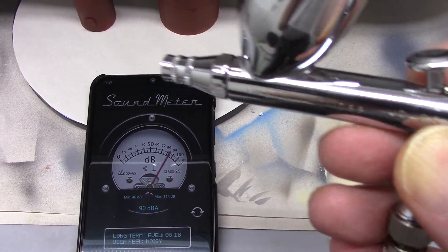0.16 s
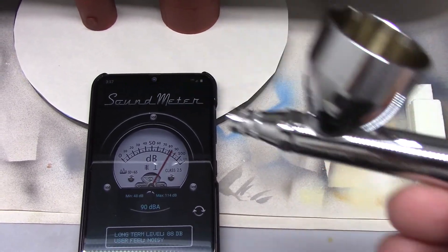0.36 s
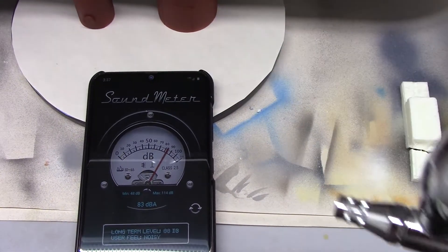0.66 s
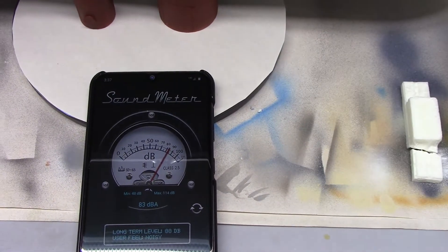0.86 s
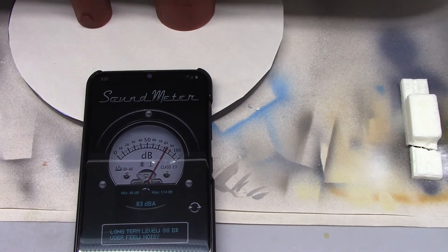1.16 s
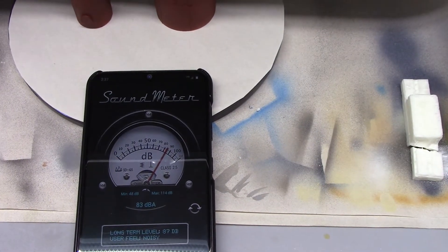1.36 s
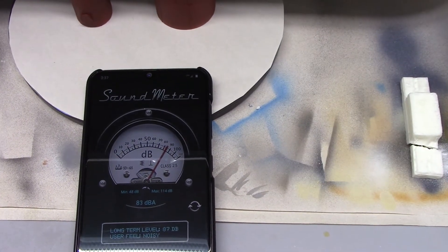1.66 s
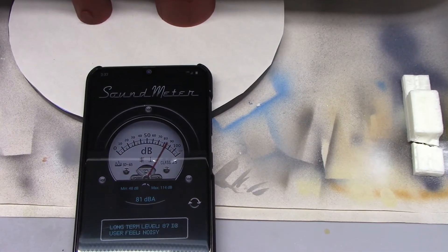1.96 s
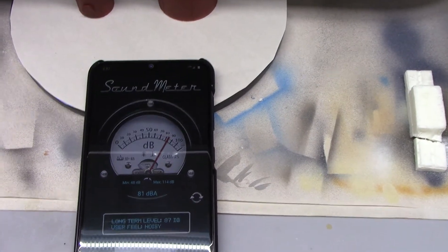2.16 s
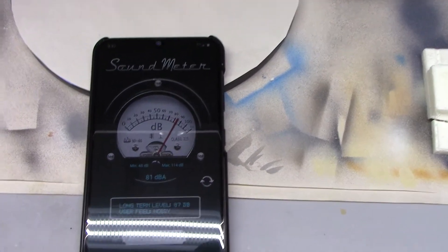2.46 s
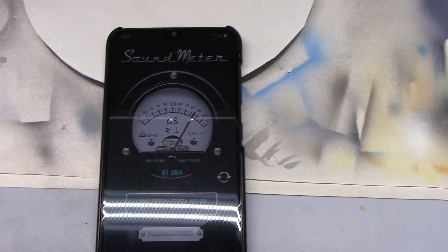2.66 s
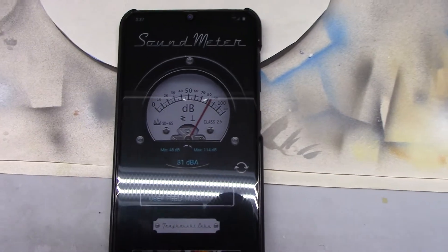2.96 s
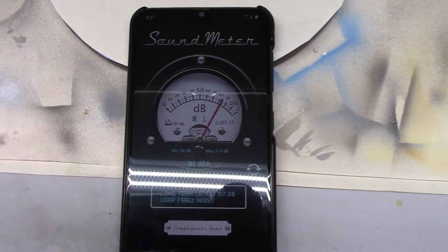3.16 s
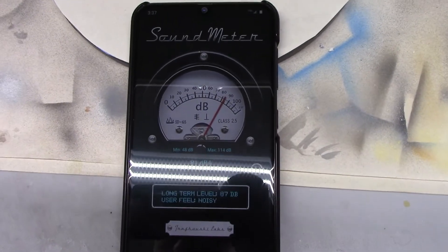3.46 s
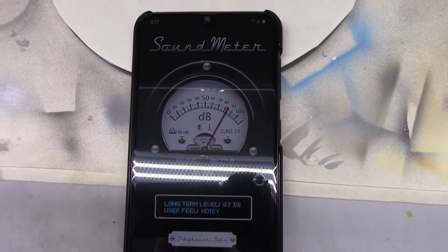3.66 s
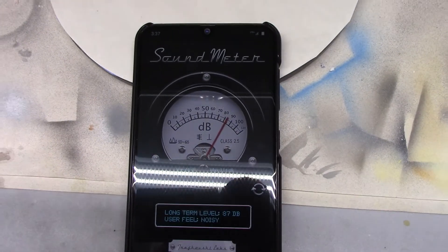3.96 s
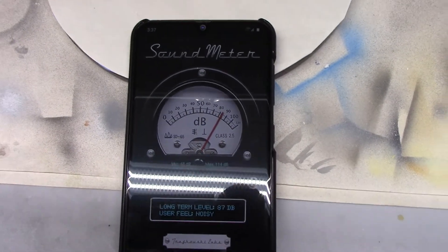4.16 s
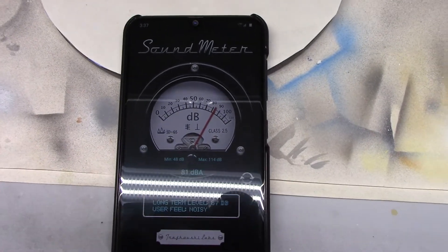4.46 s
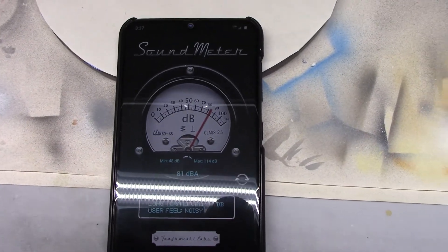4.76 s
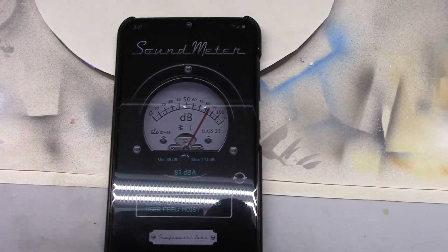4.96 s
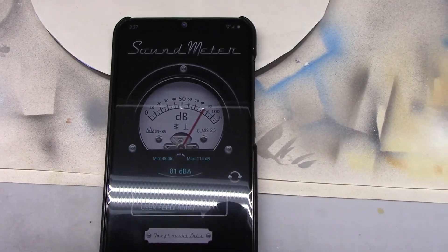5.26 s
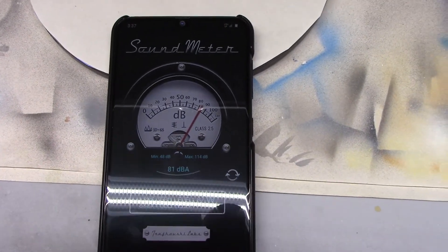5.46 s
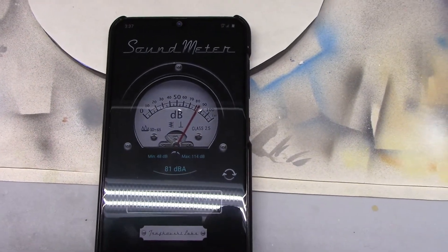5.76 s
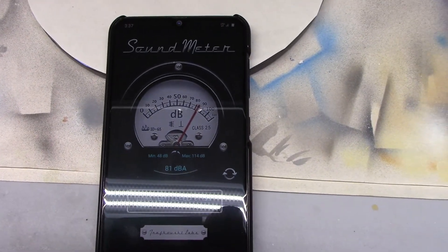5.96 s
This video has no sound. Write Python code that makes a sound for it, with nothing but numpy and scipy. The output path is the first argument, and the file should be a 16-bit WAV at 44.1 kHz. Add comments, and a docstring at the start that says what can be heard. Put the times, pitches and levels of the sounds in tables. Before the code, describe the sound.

From 0 s to about 6 s a small electric piston air compressor runs at full, steady speed, with no start or stop. The shaft turns nearly twenty-nine times a second, so its intake throb blurs into a rough low drone, strongest around 170 Hz, with buzzing motor tones and a slight fast beating. Over it lies a dense, hard chatter of valve and piston knocks, mostly between 400 and 2000 Hz, and filtered air hiss pulsing twice per turn. A thin metallic casing whine near 5 kHz swells around 0.7 s and fades by 2 s. Between 2.2 and 3 s the microphone shifts a little, gently changing the tonal balance; the whine rises again near 3.3 s, then gradually sinks toward the end. The loudness stays nearly even, close and mostly central, in a hard-walled workspace, with only faint stereo spread.

```python
"""A small motor-driven piston air compressor runs in a hard-walled workspace.
From the start each shaft turn repeats intake throb, valve and piston knocks and casing ring, a sum of shaft
orders; slow beats and the motor add side tones, and filtered noise rushes twice a turn. The casing whine swells
near 0.7 s. From 2.2 to 3 s the microphone shifts a little, crossfading to a second blend of tones; the whine
swells again near 3.3 s, then sinks toward the end."""
import sys
import numpy as np
from scipy import signal
from scipy.fft import rfft, irfft, next_fast_len
from scipy.io import wavfile
from scipy.ndimage import uniform_filter1d

SR = 44100
rng = np.random.default_rng(int(sys.argv[2]) if len(sys.argv) > 2 else 0)


def bounce(signal):
    """Save signal as a 16-bit WAV file at the path given by the first command-line argument."""
    frames = np.transpose(np.atleast_2d(signal))
    limited = np.clip(frames, -1, 1)
    pcm = np.round(limited * 32767).astype(np.int16)
    wavfile.write(sys.argv[1], SR, pcm)


N = 269451

SHAFT_HZ, START_TURN = 28.704, .0664  # mean shaft speed; shaft angle at the start [turns]
PUSH_MOMENT = .825  # the piston's push, orders 2 and 3 [turns]
PULL_HZ = 120  # magnetic pull of the motor, twice the mains
EDGE_HZ = 15730  # upper band limit
TURN_POINTS, ORDERS = 8192, 540  # points in one stored turn; shaft orders, counted from 0

# Microphone shift: (time [s], share of the way moved [0-1])
MIC_SHIFT = [(0, 0.17), (2.2, 0), (3.0, 0.86), (6.2, 0.98)]
# Rushing air and rattle, before peaks, ripples and swing: (frequency [Hz], density [dB per Hz])
RUSH_COLOUR = [(45, -88), (90, -90), (150, -70), (270, -71.5), (540, -65.5), (1050, -63), (1900, -62),
               (2400, -67), (5100, -72.5), (6500, -75.5), (9500, -81), (12000, -84), (15000, -89),
               (15700, -95)]
# Resonant peaks in the rush: (frequency [Hz], width [Hz], lift [dB])
HISS_PEAKS = [(2810, 110, 5), (3490, 250, 3), (5190, 300, 4), (6030, 200, 0.5), (7100, 200, -0.5),
              (7900, 130, 1.5), (9000, 270, 4), (9700, 280, 5.5), (14500, 300, -1)]
# Depth of the rush's swing over each stroke: (frequency [Hz], swing [dB])
STROKE_SWING = [(300, -5), (1500, -0.5), (5000, 1.5), (12000, 1)]
# Side-tone families beside every order: (offset [Hz], level on top of the colour [dB])
BEATS = [(4.5, -4), (5, 3), (-5, -17), (9.5, -8.5), (-10, -3), (14.5, -3), (7, -14), (-9, -12)]
# Colour of the side tones: (frequency [Hz], level of one tone before its family level [dB])
BEAT_COLOUR = [(130, -62), (200, -51.5), (300, -62.5), (420, -48.5), (550, -48.5), (700, -59.5),
               (850, -51.5), (1050, -57.5), (1300, -56), (1800, -63.5), (2500, -61), (5000, -82),
               (8000, -81), (13000, -88)]
# Motor tones: (shaft order [count], multiple of the pull [count], level [dB])
MOTOR_TONES = [(30, 1, -47.5), (30, 2, -38.5), (30, 3, -45), (30, 4, -58), (31, 2, -37.5), (26, 2, -42.5)]
# Casing whine: (frequency [Hz], width [Hz], level before the shift [dB], level after [dB]), both before the swell
WHINE = (5113, 382, -53, -51.5)
# Swell of the whine: (time [s], lift [dB])
WHINE_SWELL = [(0, 2), (.7, 4.5), (1.3, 2), (2, -0.5), (2.6, 3.5), (3.3, 5), (3.9, 3), (4.5, 3), (5.1, 1),
               (5.6, -0.5), (6.2, -1)]
# Typical level of one order above the throb: (frequency [Hz], level [dB])
ORDER_COLOUR = [(340, -59), (650, -59.5), (950, -48.5), (1250, -50.5), (1400, -53), (1850, -46.5),
                (2300, -52), (2800, -54), (3600, -56), (4300, -56), (5100, -64), (5800, -56), (7000, -68.5),
                (9500, -81), (13000, -85)]
# Valve and piston knocks: (frequency [Hz], width [Hz], level before the shift [dB], level after [dB],
# moment in the turn [0-1], struck both ways each turn [1 = yes])
KNOCKS = [(344, 25, -38, -40.5, .364, 0), (420, 105, -35.8, -36, .352, 0), (531, 50, -44, -41.5, .22, 0),
          (574, 25, -34.8, -32.4, .693, 0), (708, 85, -36.5, -39.5, .1, 0), (804, 30, -36, -44.4, .2104, 0),
          (832, 25, -37, -35, .9, 0), (882, 55, -39, -36.4, .9, 0), (988, 50, -37, -34.4, .6, 0),
          (1128, 80, -34.6, -33.8, .99, 0), (1246, 50, -40.8, -43, .2, 0), (1500, 380, -52, -54, .65, 0),
          (1592, 50, -43, -45, .78, 0), (1751, 25, -39.8, -34.6, .28, 0), (1835, 170, -39, -38.2, .28, 1),
          (1972, 50, -38.5, -43, .241, 0), (2095, 30, -43.4, -45, .6, 0), (2813, 25, -45.2, -44.8, .1, 0)]
# Intake throb: (shaft order [count], level before the shift [dB], level after [dB])
THROB = [(2, -48.9, -49.4), (3, -48.5, -47.6), (4, -34.7, -33.4), (5, -28.8, -28.9), (6, -23.7, -24.0),
         (7, -28.3, -28.0), (8, -29.1, -28.6), (9, -38.9, -37.2), (10, -48.6, -51.0), (11, -46.6, -43.7)]
# Downward glide of the intake tone: (steady lead [turns], extra lead at order 4 [turns], growth per order [factor])
INTAKE_GLIDE = (.119, .072, 2.11)
# Left-right scatter: (frequency [Hz], level against the sum, before a fixed lift [dB])
STEREO_SCATTER = [(60, -36), (95, -45), (150, -87), (240, -42), (380, -28), (600, -28.5), (950, -25.5),
                  (1500, -22.5), (2380, -19.5), (3770, -18.5), (5980, -15), (9470, -11), (15000, -14)]


def amp(db):
    """Gain from dB."""
    return 10 ** (np.asarray(db) / 20)


def read(points, hz):
    """A table read along a logarithmic frequency axis."""
    f, value = np.transpose(points)
    return np.interp(np.log(hz + 1), np.log(f + 1), value)


def curve(points):
    """A table drawn out over time."""
    s, value = np.transpose(points)
    return np.interp(np.arange(N) / SR, s, value)


def wander(rate_hz, count=24):
    """Slow drift of rms 1: sines of random phase from 0.2 Hz to rate_hz, the slower the stronger."""
    t = np.arange(0, N + 128, 64) / SR
    f = np.geomspace(.2, rate_hz, count)[:, None]
    sines = np.sin(2 * np.pi * (f * t + rng.random((count, 1))))
    drift = (sines / np.sqrt(f)).sum(0)
    return np.interp(np.arange(N) / SR, t, drift / drift.std())


def chance(count):
    """Complex order heights of mean power 1, as modes of casing and room add at random."""
    return rng.standard_normal((count, ORDERS, 2)) @ [1, 1j] / np.sqrt(2)


def ring(hz, peak_hz, width):
    """A flat-topped resonance of gain 1."""
    return 1 / (1 + (2 * (hz - peak_hz) / width) ** 4)


def played(heights, turns):
    """One turn built from complex order heights, read at the shaft angle."""
    turn = np.fft.ifft(heights, TURN_POINTS) * TURN_POINTS * np.sqrt(2)
    at = turns % 1 * TURN_POINTS
    k = at.astype(int)
    step = turn[(k + 1) % TURN_POINTS] - turn[k]
    return turn[k] + (at - k) * step


def crossfade(before, after):
    """The microphone shift, a linear fade from the first blend to the second."""
    moved = np.clip(curve(MIC_SHIFT), 0, 1)
    return (1 - moved) * before + moved * after


def blend(heights, turns):
    """Two sets of order heights, passing from one to the other as the microphone shifts."""
    return crossfade(played(heights[0], turns), played(heights[1], turns)).real


def rush(turns):
    """Air noise that swells on the two strokes of each turn, rippled in colour as by near reflections."""
    size = next_fast_len(N)
    hz = np.fft.rfftfreq(size, 1 / SR)
    colour_db = read(RUSH_COLOUR, hz)
    for peak_hz, width, lift_db in HISS_PEAKS:
        colour_db = colour_db + lift_db / (1 + (2 * (hz - peak_hz) / width) ** 2)
    # smoothed over 400 bins, brought back to rms 1; one set for each side of the shift
    ripples = uniform_filter1d(rng.standard_normal((2, len(hz))), size=400, axis=1) * 20
    noise = rfft(rng.standard_normal(size))
    both = irfft(noise * amp(colour_db + 2.9 * ripples) * np.sqrt(SR / 2), size)[:, :N]
    steady = crossfade(both[0], both[1] * amp(-0.5))

    f, t, frames = signal.stft(steady, SR, nperseg=128, noverlap=96)
    angle = 2 * np.pi * np.interp(t, np.arange(N) / SR, turns)
    stroke = np.cos(2 * (angle - 1.9)) + 0.1 * np.cos(angle - 2.2)
    flicker = uniform_filter1d(rng.standard_normal(len(t)), size=12) * np.sqrt(12)
    swing = amp(read(STROKE_SWING, f)[:, None] * (stroke + .5 * flicker))
    return signal.istft(frames * swing, SR, nperseg=128, noverlap=96)[1][:N]


def beat_tones(turns):
    """Each slow beat against the shaft sets a weaker comb beside the orders."""
    t = np.arange(N) / SR
    colour = amp(read(BEAT_COLOUR, np.arange(ORDERS) * SHAFT_HZ))
    heights = colour * chance(count=len(BEATS))
    heights[:, :4] = 0  # no side tones at the lowest orders
    out = np.zeros(N)
    for (offset_hz, db), comb in zip(BEATS, heights):
        shifted = played(comb, turns) * np.exp(2j * np.pi * offset_hz * t)
        out += amp(db) * shifted.real
    return out


def motor_tones():
    """The motor's magnetic pull adds sines above shaft orders, each drifting in phase."""
    t = np.arange(N) / SR
    out = np.zeros(N)
    for order, multiple, db in MOTOR_TONES:
        hz = round(order) * SHAFT_HZ + round(multiple) * PULL_HZ
        phase = 2 * np.pi * (hz * t + rng.random()) + 0.79 * wander(3.22)
        out += amp(db) * np.sqrt(2) * np.sin(phase)
    return out


def casing_whine(turns):
    """The casing resonates to a band of shaft orders, whose level swells and wavers."""
    peak_hz, width, before_db, after_db = WHINE
    resonance = ring(np.arange(ORDERS) * SHAFT_HZ, peak_hz, width)
    heights = amp([[before_db], [after_db]]) * resonance * chance(count=2)
    return blend(heights, turns) * amp(curve(WHINE_SWELL) + 1.2 * wander(9.9))


def knocks():
    """Order heights of valve and piston knocks, each ringing one resonance at its moment in the turn."""
    k = np.arange(ORDERS)
    heights = np.zeros((2, ORDERS), complex)
    for peak_hz, width, before_db, after_db, moment, both_ways in KNOCKS:
        struck = ring(k * SHAFT_HZ, peak_hz, width) * np.exp(-2j * np.pi * moment * k)
        if round(both_ways):
            struck *= k % 2  # odd orders alone: the opposite blow half a turn later
        heights += amp([[before_db], [after_db]]) * struck
    return heights


def intake_throb():
    """Low order heights, phased so that the intake tone glides down through the stroke."""
    steady, extra, growth = INTAKE_GLIDE
    lead = steady + extra * growth ** (np.arange(12) - 4.)
    # each order's phase sums the leads below it, so higher orders come earlier in the stroke
    swept = 2 * np.pi * (np.cumsum(lead) - lead)
    angle = swept - swept[6]
    angle[:4] = -2 * np.pi * PUSH_MOMENT * np.arange(4)
    angle[10:] = 2 * np.pi * rng.random(2)
    heights = np.zeros((2, ORDERS), complex)
    for order, before_db, after_db in THROB:
        k = round(order)
        heights[:, k] = amp([before_db, after_db]) * np.exp(1j * angle[k])
    return heights


def pump(turns):
    """The shaft orders: throb at the bottom, knocks and a random ring of casing and room above, plus whine."""
    ringing = amp(read(ORDER_COLOUR, np.arange(ORDERS) * SHAFT_HZ)) * chance(count=2)
    ringing[:, :12] = 0  # the throb's own range
    heights = ringing + intake_throb() + knocks()
    return blend(heights, turns) + casing_whine(turns)


def stereo(mid):
    """A faint, ever-changing random scatter of the sum, added left and subtracted right."""
    hz, _, frames = signal.stft(mid, SR, nperseg=4096, noverlap=3072)
    scatter = rng.standard_normal(frames.shape + (2,)) @ [1, 1j] * np.sqrt(2)
    level = amp(read(STEREO_SCATTER, hz))[:, None]
    side = signal.istft(frames * scatter * level, SR, nperseg=4096, noverlap=3072)[1][:N]
    return np.array([mid + side, mid - side])


def scene():
    """One slightly uneven shaft angle times the rush, side tones and pump; motor tones hold the mean speed."""
    turns = START_TURN + SHAFT_HZ * np.arange(N) / SR + 0.00088 * wander(6.)
    tones = pump(turns) + beat_tones(turns) + motor_tones()
    unsteady = amp(.12 * wander(8.))
    return stereo(tones * unsteady + rush(turns))


def record(dry):
    """A steep low-pass sets the band limit."""
    lowpass = signal.firwin(1023, EDGE_HZ, window=("kaiser", 10), fs=SR)
    return signal.oaconvolve(dry, lowpass[None], "same")


dry = scene()
out = record(dry)
bounce(out)
```